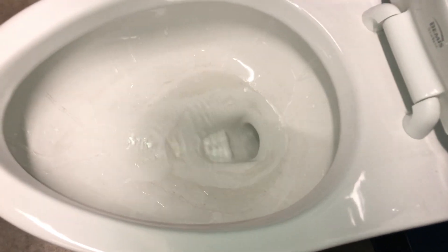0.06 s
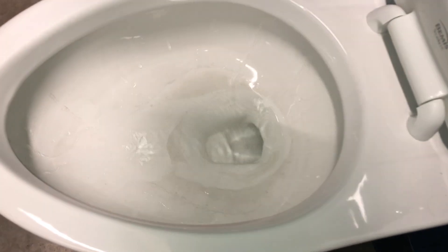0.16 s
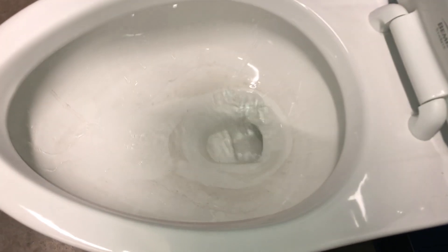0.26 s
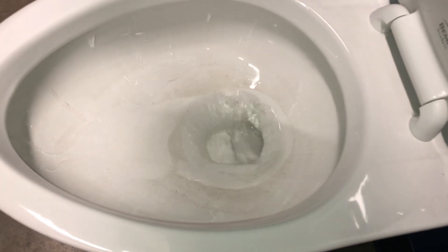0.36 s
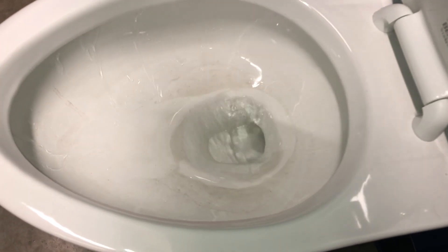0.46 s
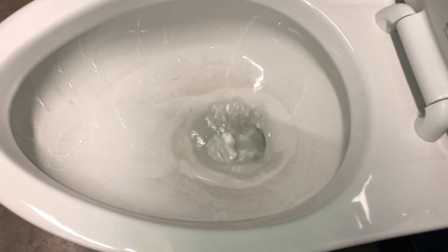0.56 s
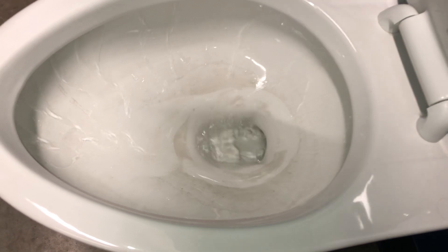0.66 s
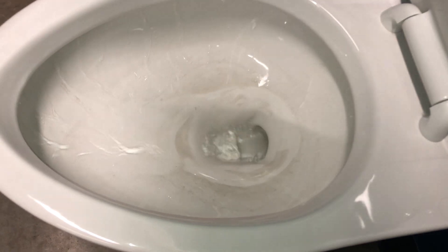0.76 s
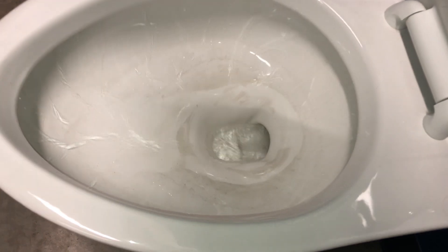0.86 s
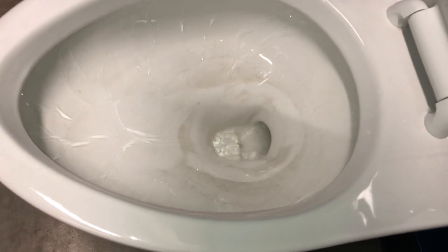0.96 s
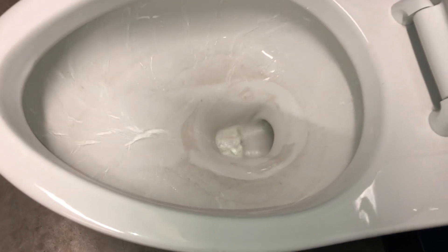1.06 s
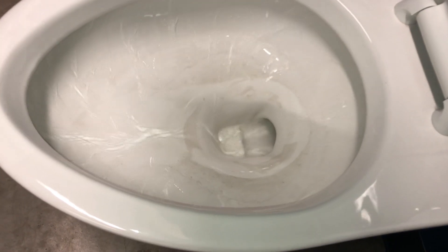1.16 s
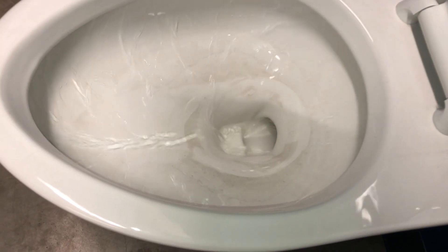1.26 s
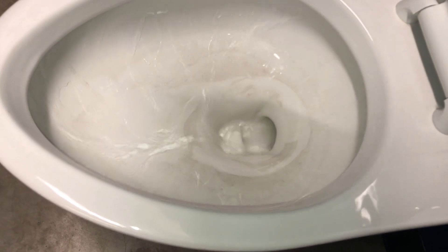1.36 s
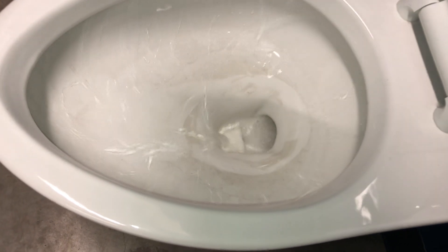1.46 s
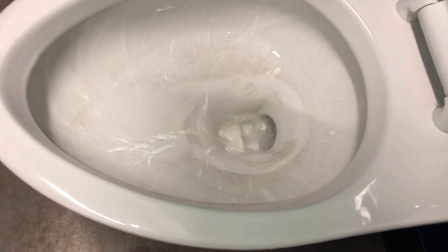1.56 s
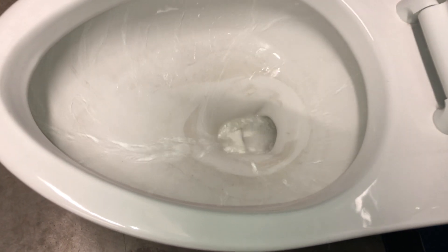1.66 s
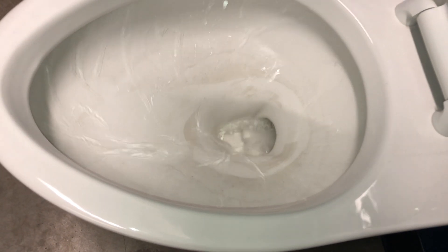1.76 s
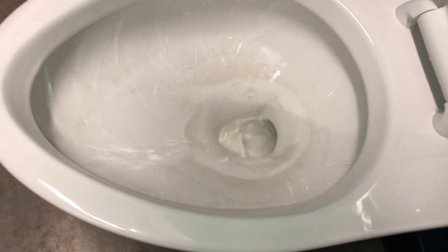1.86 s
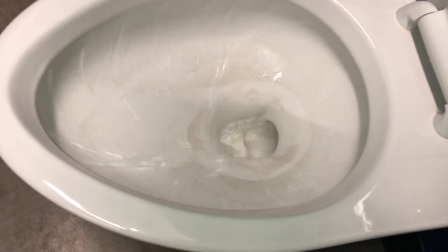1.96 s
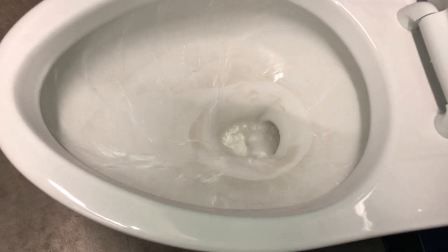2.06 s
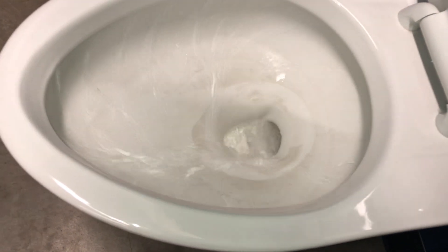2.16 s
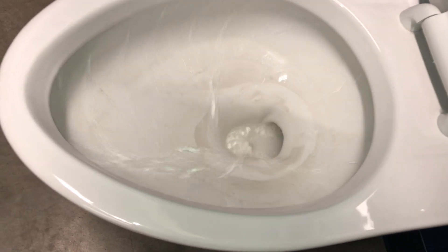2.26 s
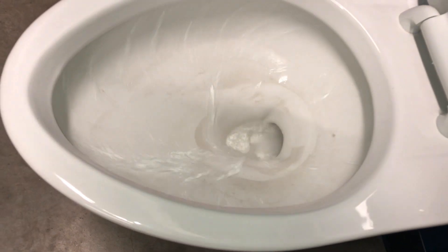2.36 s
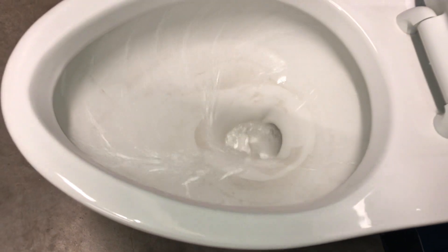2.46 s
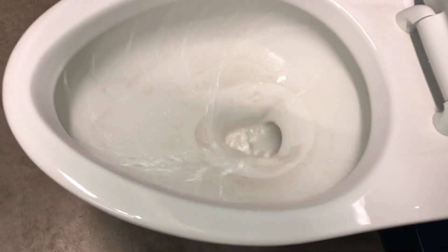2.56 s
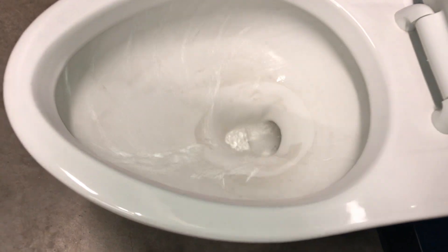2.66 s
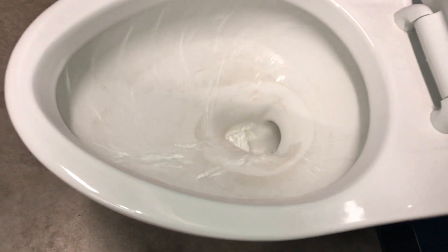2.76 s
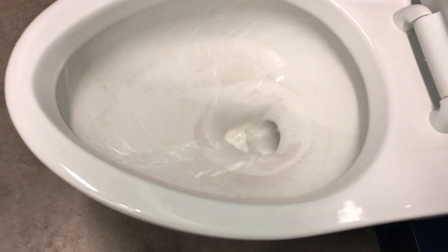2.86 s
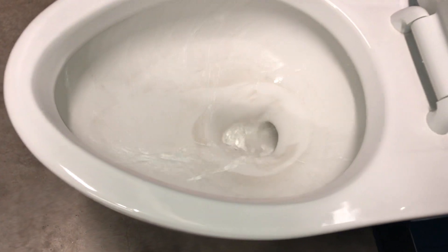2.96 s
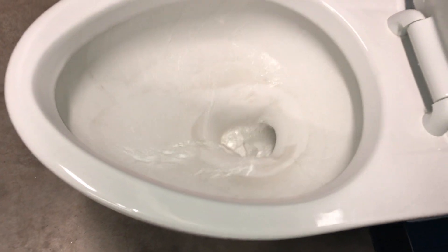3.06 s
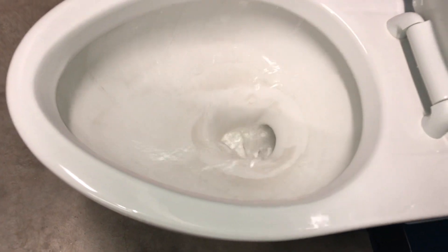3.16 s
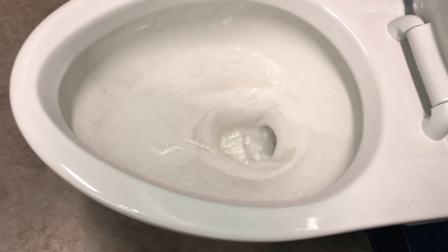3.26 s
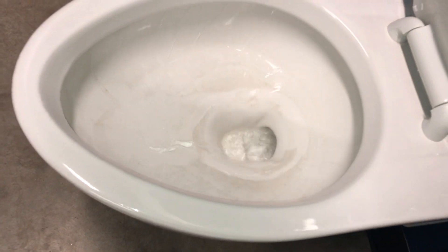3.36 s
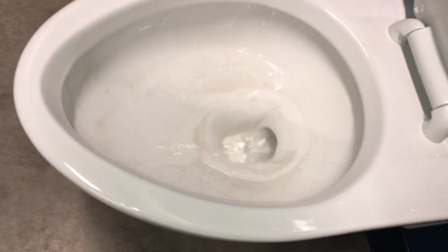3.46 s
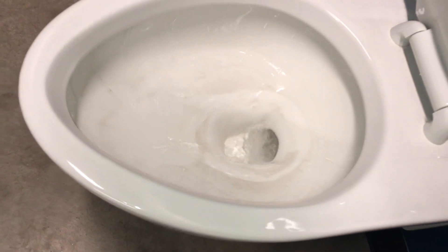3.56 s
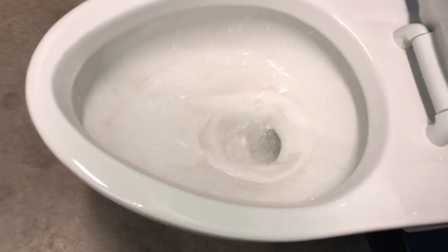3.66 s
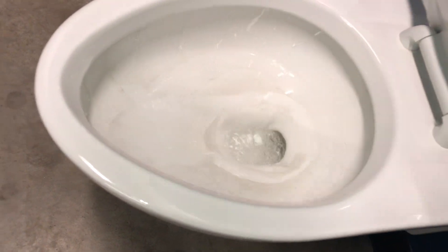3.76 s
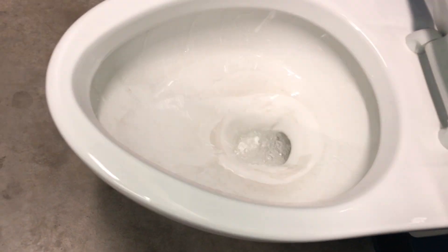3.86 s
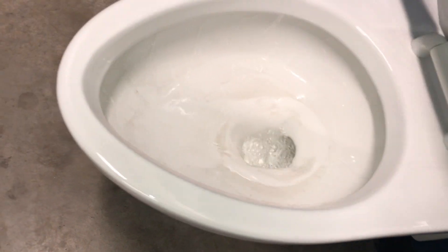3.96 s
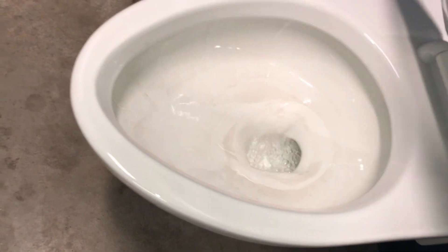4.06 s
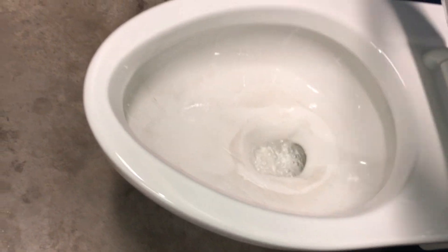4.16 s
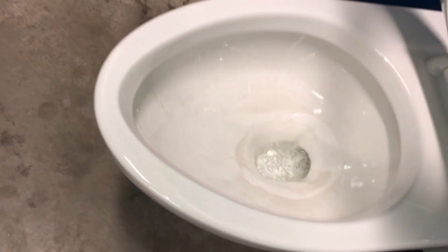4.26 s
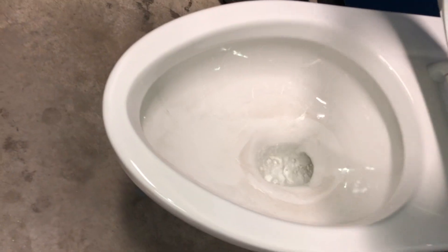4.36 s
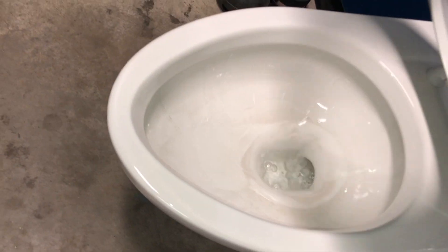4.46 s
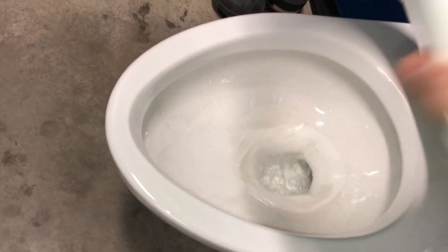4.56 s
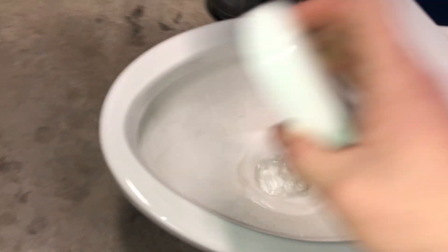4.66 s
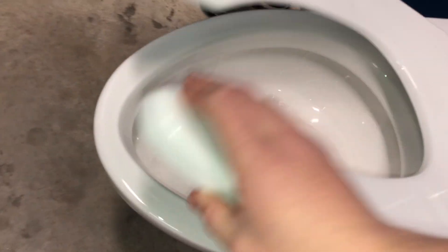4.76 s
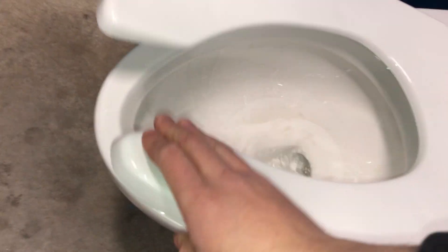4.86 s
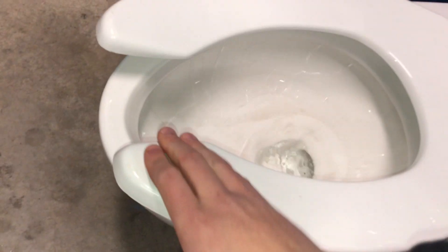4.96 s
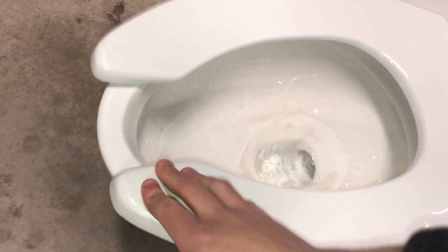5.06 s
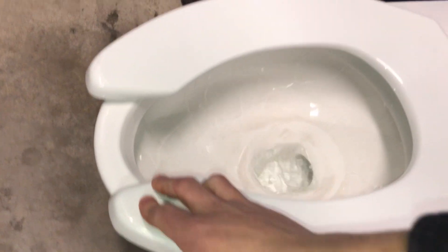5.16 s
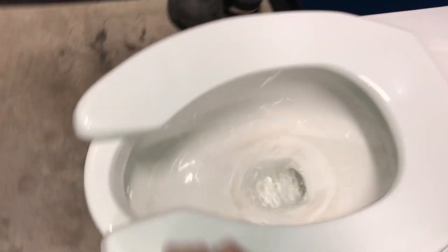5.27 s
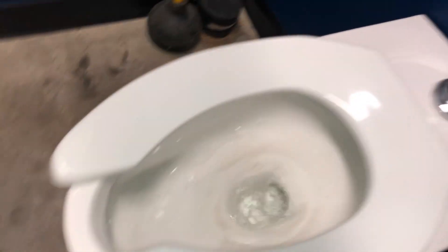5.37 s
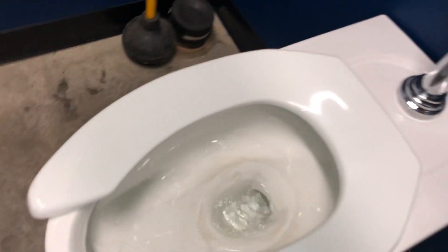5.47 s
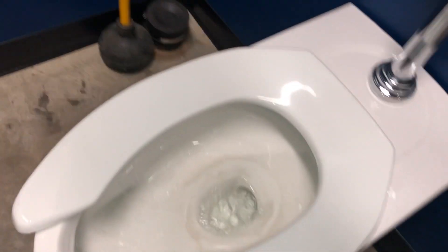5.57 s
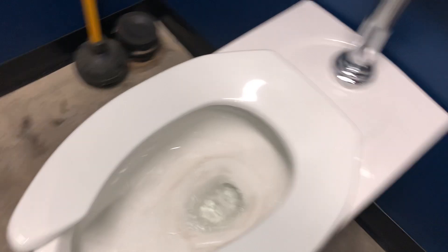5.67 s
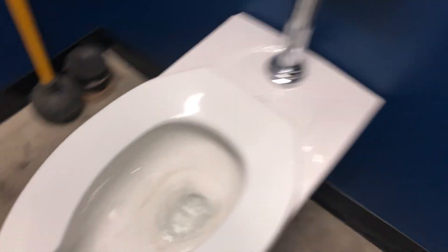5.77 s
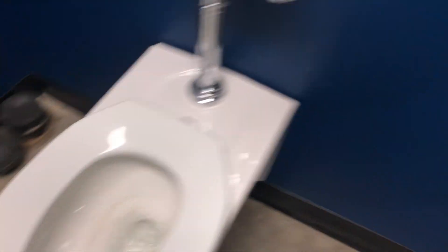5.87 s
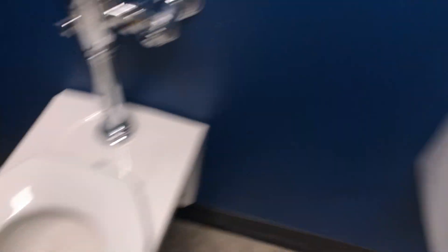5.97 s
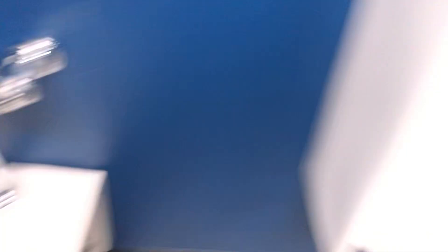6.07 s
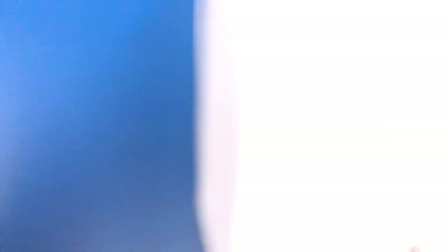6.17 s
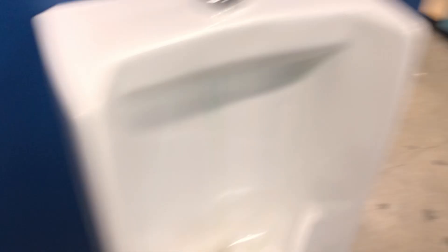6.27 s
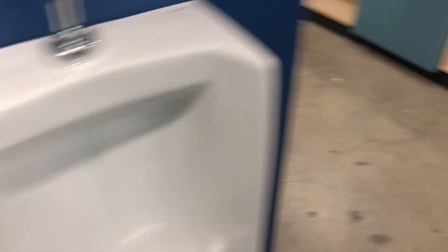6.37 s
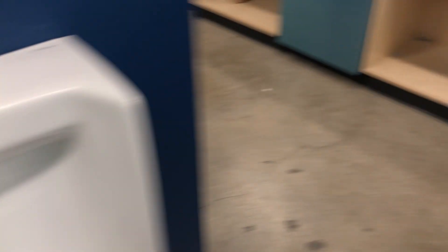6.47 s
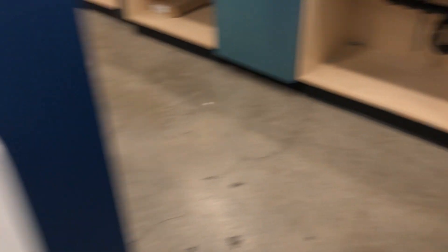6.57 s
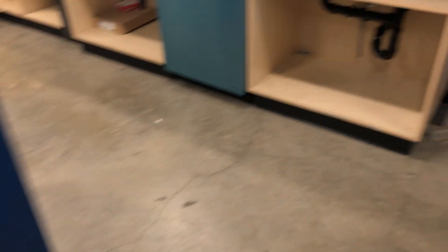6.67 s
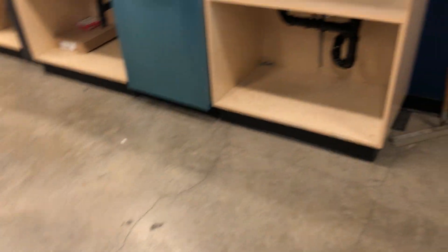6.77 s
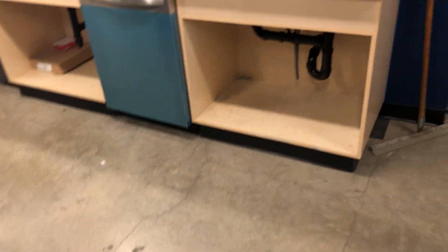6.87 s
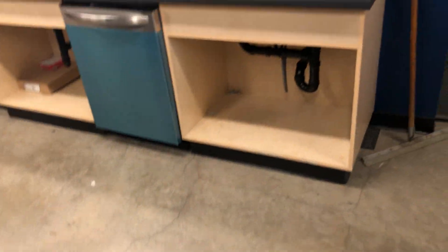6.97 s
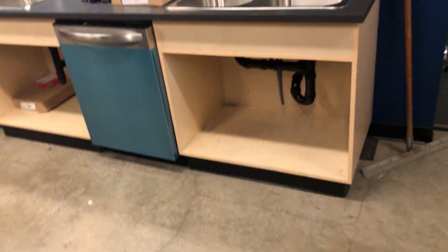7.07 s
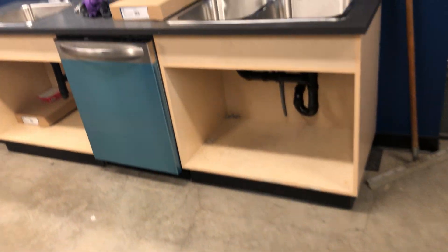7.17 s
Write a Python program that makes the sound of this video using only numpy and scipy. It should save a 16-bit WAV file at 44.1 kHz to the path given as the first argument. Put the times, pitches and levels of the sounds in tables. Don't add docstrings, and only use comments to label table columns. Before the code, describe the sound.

A toilet gurgles and gulps, its flush roars around the china bowl, cuts off into drips, then the plastic seat clatters down and shoes scuff concrete.

```python
import sys
import numpy as np
from scipy import signal
from scipy.fft import rfft, irfft, next_fast_len
from scipy.io import wavfile
from scipy.ndimage import uniform_filter1d

SR = 44100
rng = np.random.default_rng(int(sys.argv[2]) if len(sys.argv) > 2 else 0)


def convert_level_to_amplitude(level_db):
    exponent = np.asarray(level_db, float) / 20
    return 10 ** exponent


def pcm_store(signal):
    levels = np.round(np.clip(np.atleast_2d(signal), -1, 1) * 32767)
    wavfile.write(sys.argv[1], SR, levels.astype(np.int16).T)


N = 318402
JET_ON_S, JET_OFF_S = 0.875, 3.21
EDGE_HZ = 15740


def evened(x):
    return x / np.sqrt(np.mean(x ** 2) + 1e-20)


def read(points, hz):
    f, value = np.transpose(points)
    return np.interp(np.log(hz + 1), np.log(f + 1), value)


def curves(rows):
    s, *columns = np.transpose(rows)
    return [np.interp(np.arange(N) / SR, s, c) for c in columns]


def add(mix, s, sound):
    part = mix[round(s * SR):][:len(sound)]
    part += sound[:len(part)]


def colour(x, gain):
    size = next_fast_len(len(x))
    spectrum = rfft(x, size) * gain(np.fft.rfftfreq(size, 1 / SR))
    return evened(irfft(spectrum, size)[:len(x)])


def below(hz, edge_hz, order=6):
    return 1 / np.sqrt(1 + (hz / edge_hz) ** (2 * order))


def above(hz, edge_hz):
    return np.sqrt(1 - below(hz, edge_hz) ** 2)


def patchy(patch_db, flicker_db, frames=6, bins=5):
    count = N // 128 + 6
    a, b, patches = rng.standard_normal((count, 257, 3)).T
    patches = uniform_filter1d(patches, bins, axis=0)
    patches = evened(uniform_filter1d(patches, frames, axis=1))
    flicker = evened(uniform_filter1d(rng.standard_normal(count), size=5))
    depth = np.clip(np.arange(257) / 14, .15, 1)[:, None]
    z = (a + 1j * b) * convert_level_to_amplitude(depth * (patch_db * patches + flicker_db * flicker))
    return evened(signal.istft(z, nperseg=512, noverlap=384)[1][:N])


def blip(hz, cycles, glide):
    u = np.arange(int(4 * cycles * SR / hz) + 8) * hz / SR
    swing = np.sin(2 * np.pi * u * (1 + glide * u / cycles))
    return swing * np.exp(-2 * u / cycles) * (1 - np.exp(-2 * u))


def bubbles(per_s, spread_db, cycles, size, count=30):
    out = np.zeros(size)
    for hz in np.geomspace(190, 15000, num=count):
        how_many = int(per_s * np.sqrt(hz / 1000) * size / SR)
        at, luck = rng.random((how_many, 2)).T
        strength = convert_level_to_amplitude(spread_db * np.minimum(-np.log(luck), 2.8))
        clicks = np.bincount((at * size).astype(int), strength, size)
        shape = blip(hz, cycles, 0.043)
        shape = shape / np.linalg.norm(shape) * (hz / 1000) ** 0.13
        out += signal.oaconvolve(clicks, shape)[:size]
    return np.resize(evened(out), N)


# time in seconds, water flow in dB, air gulped by the trap in dB.
FLOW = [(0.0, -16, -1), (0.3, -15.5, -4.5), (0.45, -11.5, -7), (0.74, -8, -1.5), (0.84, -12.5, -4.5),
        (0.95, -1.5, 4), (1.15, 4, 2.5), (1.5, 0, -1.5), (2.84, -1.5, -3), (2.92, -3.5, -3.5),
        (3.04, -12, -10.5), (3.19, -14, -33), (3.3, -21, -24), (3.58, -21, -18.5), (3.66, -31.5, -18),
        (4.25, -35.5, -34), (4.33, -42.5, -24), (5.06, -44, -28)]
SPLITS_HZ = [175, 480, 1600, 6500, SR]
# level in dB while sucking, under the jet and while draining,
# then how far it follows the flow and the air (shares).
LAYERS = [
    (-28, -30, -29, 0.086, 1),
    (-27.5, -29, -26.5, 0.64, 0.29),
    (-27.5, -25.5, -28, .95, 0.03),
    (-19.5, -23.5, -32, 0.83, 0.14),
]
# time in seconds, half length in seconds,
# centre in Hz, lift in dB.
SURGES = [(0.0, 0.035, 405, 20.5), (0.068, 0.012, 10000, -4), (0.888, 0.014, 10000, -8),
          (0.865, 0.015, 10000, -7), (0.915, 0.012, 10000, -5), (0.7, 0.2, 4500, 2), (0.84, 0.06, 7000, -8),
          (0.9, 0.05, 3200, -3), (1.194, 0.29, 12000, -4), (0.887, 0.1, 600, 13), (1.475, 0.031, 900, 7.5),
          (1.463, 0.02, 3200, 8), (1.649, 0.021, 300, 11), (1.645, 0.036, 10000, -5), (2.09, 0.053, 300, 9),
          (2.176, 0.033, 900, -3), (2.085, 0.02, 10000, -5), (2.192, 0.014, 10000, -6),
          (2.226, 0.018, 10000, -6), (1.82, 0.02, 10000, -3), (2.38, 0.025, 8000, -3),
          (2.236, 0.024, 900, 6), (2.252, 0.018, 3200, 3.5), (2.73, 0.02, 10000, 3), (2.815, 0.034, 700, 6),
          (3.338, 0.02, 10000, 2), (3.5, .03, 9000, 10), (3.584, 0.051, 900, 5), (3.586, 0.027, 12000, 3),
          (3.902, 0.034, 10000, 5), (4.21, 0.085, 4000, 9), (4.4, 0.05, 10000, -14), (4.723, 0.02, 900, 19),
          (4.934, .012, 3500, 17)]


def layer_levels(length):
    chop_db, chop_s, surge_octaves = 1, .04, 0.55
    t = np.arange(length) / SR
    flow_db, air_db = (c[:length] for c in curves(FLOW))
    levels = []
    for (*_, by_flow, by_air), lo, hi in zip(LAYERS, SPLITS_HZ, SPLITS_HZ[1:]):
        knots = np.arange(0, 6, .01)
        chop = evened(uniform_filter1d(rng.standard_normal(len(knots)), max(int(chop_s * 100), 1)))
        db = by_flow * flow_db + by_air * air_db + chop_db * np.interp(t, knots, chop)
        centre_hz = np.sqrt(lo * min(hi, EDGE_HZ))
        for s, half_s, hz, lift_db in SURGES:
            near = np.exp(-(np.log2(hz / centre_hz) / surge_octaves) ** 2)
            first = max(int((s - half_s) * SR), 0)
            moments = t[first:int((s + half_s) * SR)]
            add(db, first / SR, near * lift_db * np.clip(1 - abs(moments - s) / half_s, 0, 1))
        levels.append(db)
    return levels


def churning():
    t = np.arange(SR // 10) / SR
    echoes = rng.standard_normal(len(t)) * convert_level_to_amplitude(-60 * t / .09)
    churn = patchy(patch_db=2.0, flicker_db=1.45)
    sent = colour(churn, lambda hz: .4 + .6 * above(hz, 1900))
    return evened(churn + .47 * signal.oaconvolve(sent, echoes / np.linalg.norm(echoes))[:N])


# pitch in Hz, level in dB per Hz.
SUCKING = [(71, -49), (120, -4), (150, -27), (217, 0), (306, -3.5), (383, 2), (510, -21.5), (600, -12),
           (664, -21.5), (2600, -26), (4400, -23), (5600, -22), (6200, -29), (7300, -32), (9800, -23),
           (13300, -20), (14400, -25), (15600, -26)]
# pitch in Hz, level in dB per Hz.
WATER = [(71, -45), (120, -7.5), (288, 5), (399, 5), (520, -10.5), (678, -6.5), (901, -13.5), (1060, -12.5),
         (1530, -16.5), (2000, -14.5), (3190, -12.5), (6770, -17), (11700, -10.5), (15600, -16)]
# pitch in Hz, level in dB per Hz.
DRAINING = [(240, -15), (400, -12.5), (519, -18), (653, -8.5), (773, -14), (848, -15), (1050, -10.5),
            (1880, -11.5), (2260, -5), (2560, -3.5), (5500, -11), (7250, -14.5), (15600, -23)]
# pitch in Hz, width in Hz, lift in dB.
BOWL = [(218.7, 14, 10.5), (295, 34, 12), (383, 22, 3), (725, 240, 8.5), (1072, 110, 9), (1413, 44.6, 8),
        (1500, 40, -4), (1860, 57, -8), (2120, 60, 0.5), (2800, 93, 1), (3244, 210, 4.5), (4280, 640, 3.5),
        (5640, 210, 0.5)]


def flush():
    def bowl(hz):
        return 1 + sum((convert_level_to_amplitude(db) - 1) / (1 + (2 * (hz - f) / w) ** 2) for f, w, db in BOWL)

    t, end = np.arange(N) / SR, int(FLOW[-1][0] * SR)
    churn = churning()
    gurgle = bubbles(per_s=60, spread_db=3.0, cycles=7.4, size=N // 2)
    dense = churn + 0.49 * colour(gurgle, lambda hz: above(hz, 570))
    foam = bubbles(per_s=4.2, spread_db=8.0, cycles=4.0, size=N // 3)
    crackle = colour(foam, lambda hz: above(hz, 4800)) * np.clip(5.2 - t, .3, 1)
    plops = bubbles(per_s=12, spread_db=0.5, cycles=20, size=N // 3)
    sparse = 0.73 * churn + 0.51 * plops + 0.33 * crackle

    on, off = (np.clip((t - s) / 0.081 + .5, 0, 1) for s in (JET_ON_S, JET_OFF_S))
    stages = [(dense, SUCKING, 1 - on), (dense, WATER, on - off), (sparse, DRAINING, off)]
    out, levels = np.zeros(N), layer_levels(end)
    for stage, (drive, shape, share) in enumerate(stages):
        live = np.flatnonzero(share[:end] > 0)
        rung = colour(drive[live], lambda hz: convert_level_to_amplitude(read(shape[:-1], hz)) * bowl(hz))
        for layer, db, lo, hi in zip(LAYERS, levels, SPLITS_HZ, SPLITS_HZ[1:]):
            band = colour(rung, lambda hz: above(hz, lo) * below(hz, hi))
            out[live] += np.sqrt(share[live]) * convert_level_to_amplitude(layer[stage] + db[live]) * band

    hz = np.fft.rfftfreq(SR, 1 / SR)
    middle = irfft(rfft(out[:SR]) * above(hz, 750) * below(hz, 1400), SR)
    out[:SR] -= middle * np.interp(t[:SR], [.83, .87, .91, .95], [0, .4, .4, 0])
    return out


# start in seconds, length in seconds, first pitch in Hz, last pitch in Hz, level in dB.
POCKETS = [(0, 0.069, 273.5, 268, -24.5), (0, 0.16, 1784, 1746, -44), (0, .45, 2120, 2120, -49),
           (.1, 0.055, 846, 915, -34), (.1, 0.069, 1210, 1200, -38.5), (.05, 0.19, 1500, 1515, -46),
           (.112, 0.28, 247.3, 210.4, -30.5), (.284, 0.088, 618, 598, -32.5), (.36, 0.18, 816, 820, -40.5),
           (.52, 0.04, 2860, 2790, -48), (.579, 0.23, 294.8, 329, -32), (.813, 0.055, 290, 310, -23.5),
           (.86, .025, 380, 520, -25), (3.403, .015, 756, 756, -40.5), (3.45, 0.065, 1380, 1330, -52),
           (3.558, 0.03, 1070, 1000, -34), (3.576, 0.014, 800, 730, -33.5),
           (3.798, 0.17, 1596, 1550, -57.5), (3.865, 0.035, 678, 677, -48), (3.91, 0.04, 680, 690, -51),
           (3.815, 0.02, 1100, 1300, -52), (3.92, 0.025, 1450, 1400, -54), (3.86, 0.07, 2300, 2350, -57),
           (4.147, 0.02, 2260, 2280, -56), (4.175, 0.015, 2280, 2250, -56), (4.14, 0.09, 1540, 1570, -60)]
# start in seconds, length in seconds, first pitch in Hz, last pitch in Hz, level in dB.
CAVITIES = [(0.78, 0.08, 560, 560, -34), (0.865, 0.055, 480, 660, -24), (0.1, 0.5, 3500, 3500, -46),
            (0.922, 0.06, 1000, 1250, -25), (0.91, 0.3, 600, 700, -28), (0.995, 0.03, 900, 1000, -24),
            (0.74, 0.06, 4900, 4600, -36), (0.715, 0.04, 11300, 11800, -36),
            (0.45, 0.22, 13300, 13200, -38), (0.4, 0.17, 5600, 5600, -43), (0.63, 0.1, 4200, 4500, -41),
            (1.03, 0.15, 1050, 1356, -26), (2.221, 0.03, 1050, 1116, -24.5),
            (3.089, .099, 3200, 3280, -40.5), (3.596, .034, 1310, 1360, -45.5),
            (3.878, 0.04, 2900, 2750, -55), (6.747, 0.27, 2200, 2200, -65)]


def pockets():
    out = np.zeros(N)
    narrow = [(*row, 23 + 0.016 * row[2]) for row in POCKETS]
    broad = [(*row, 540) for row in CAVITIES]
    for start, length_s, first_hz, last_hz, db, width in narrow + broad:
        length = int(length_s * SR)

        def slow(f):
            return 1 / (1 + (2 * f / width) ** 2) * below(f, 0.6 * first_hz)

        a, b = (colour(v, slow)[:length] for v in rng.standard_normal((2, SR // 2)))
        turn = 2 * np.pi * np.cumsum(np.linspace(first_hz, last_hz, length)) / SR
        whistle = evened(a * np.cos(turn) + b * np.sin(turn))
        add(out, start, convert_level_to_amplitude(db) * whistle * signal.windows.tukey(length, .35))
    return out


# time in seconds, peak level in dB, dullest pitch in Hz.
SPURTS = [(0.0844, -20, 7000), (0.1481, -21, 7000), (0.1855, -16, 7000), (0.3394, -21, 7000),
          (0.7524, -18, 7000), (0.8754, -12, 7000), (0.9014, -12, 7000), (2.1016, -12, 7000),
          (2.155, -8, 7000), (2.2024, -13, 7000), (2.2409, -13, 7000), (2.2717, -11, 7000),
          (2.5486, -14, 7000), (2.6574, -12, 7000), (2.7965, -15, 7000), (2.8764, -14, 7000)]


def spurts():
    out, t = np.zeros(N), np.arange(SR // 20) / SR
    for s, db, hz in SPURTS:
        spit = colour(rng.standard_normal(len(t)), lambda f: above(f, hz))
        add(out, s, convert_level_to_amplitude(db - 9.5 - 60 * t / .03) * spit)
    return out


# time in seconds, peak level in dB, pitch in Hz.
THUDS = [
    (3.241, -32, 48),
    (3.328, -33, 45),
    (5.135, -41, 48),
]


def valve():
    out = np.zeros(N)
    for s, db, hz in THUDS:
        u = np.arange(int(2.6 * SR / hz)) * hz / SR
        add(out, s, -convert_level_to_amplitude(db) * np.sin(2 * np.pi * u) * signal.windows.tukey(len(u), .4))
    return out


# time in seconds, peak level in dB, pitch in Hz.
DRIPS = [(3.264, -24, 5040), (3.281, -27, 3760), (3.432, -26, 4650), (3.4444, -32, 2100),
         (3.539, -26, 5400), (3.5823, -27, 8200), (3.6735, -35, 3550), (3.8836, -35, 2760),
         (4.0158, -39, 5000), (4.106, -36, 5070), (4.1823, -24, 4760), (4.185, -33, 5200),
         (4.2243, -35, 3450), (4.225, -40, 4200), (4.2338, -38, 2900), (4.2345, -37, 4650),
         (4.242, -42, 3400), (4.26, -41, 4650), (4.5371, -37, 4600), (4.569, -27, 9150),
         (4.5985, -39, 4100), (4.7095, -52, 2320), (4.927, -37, 4960), (5.0205, -41, 4950)]
# time in seconds, peak level in dB, pitch in Hz.
TICKS = [(3.229, -15, 8550), (3.262, -20, 9850), (3.3096, -26, 11800), (3.362, -27, 9830),
         (3.3839, -41, 12000), (3.4064, -23, 12900), (3.4897, -38, 14000), (3.5278, -19, 12700),
         (3.55, -32.5, 12900), (3.563, -25, 10200), (3.6244, -32, 11400), (3.658, -32, 9000),
         (3.718, -45, 8700), (3.776, -30, 12800), (4.003, -35.5, 13800), (4.016, -38, 9710),
         (4.0579, -45, 12000), (4.1372, -38, 10200), (4.1741, -45, 14300), (4.2016, -34, 11500),
         (4.2764, -47, 11700), (4.2904, -41, 10900), (4.3402, -48, 8120), (4.4126, -49, 11300),
         (4.5685, -39.5, 9230), (4.71, -39, 12500), (4.8251, -45, 8970)]


def trickle():
    out = np.zeros(N)
    for s, db, hz in DRIPS:
        add(out, s, convert_level_to_amplitude(db - 4.0) * blip(hz, 14, 0.047))
    for s, db, hz in TICKS:
        add(out, s, convert_level_to_amplitude(db + 2.5) * blip(hz, 3.5, .02))
    return out


# pitch in Hz, level in dB, seconds to fall by 60 dB.
SEAT = [(299, -3, 0.15), (390, -9, 0.1), (600, -11, 0.087), (786, -6.5, 0.1), (1000, -5, .07),
        (1120, 6, 0.21), (1330, -6, .08), (1500, -9, 0.13), (1640, -13, 0.081), (1888, -7, 0.2),
        (2170, 11.5, 0.013), (2120, -2, 0.08), (205, -8.5, 0.23), (2580, -7, 0.12), (2785, -7, .15),
        (3000, -21, .06), (3060, -5, 0.05), (3560, -1, 0.024), (4060, -9, .05), (5170, -16, 0.06)]
# time in seconds, strength of the blow in dB, hardness in Hz, # seconds of free ringing before the seat
BOUNCES = [(4.709, -49.5, 4930, 0.0062), (5.067, -58, 3500, .008), (5.0893, -17.5, 5930, 0.002),
           (5.0945, -17.5, 3860, 0.005), (5.104, -22.5, 2000, 0.0045), (5.111, -19.5, 2600, .012),
           (5.125, -25.5, 2450, 0.019), (5.134, -20.5, 1500, 0.015), (5.155, -43, 2200, 0.023),
           (5.177, -23, 1270, 0.026), (5.219, -31, 600, 0.008), (5.254, -36.5, 1290, 0.0076)]


def seat():
    rings, cracks, t = np.zeros(N), np.zeros(N), np.arange(SR // 8) / SR
    for s, blow_db, hard_hz, free_s in BOUNCES:
        modes = np.zeros(len(t))
        for hz, db, t60 in SEAT:
            a, b, c = rng.uniform(-1, 1, 3)
            level = convert_level_to_amplitude(db + 2.6 * a - 60 * t / t60) * below(hz, hard_hz, order=2)
            modes += level * np.sin(2 * np.pi * hz * (1 + 0.005 * b) * t + np.pi * c)

        def crack_tone(f):
            body = below(f, hard_hz, order=3) * above(f, 270)
            return body + 0.03 * below(hard_hz, 1.5 * f) * above(hard_hz, 2300)

        crack = colour(rng.standard_normal(len(t)), crack_tone) * convert_level_to_amplitude(-60 * t / 0.028)
        contact = np.sin(np.pi / 2 * np.minimum(t * hard_hz / 2.5, 1)) ** 2
        choke = convert_level_to_amplitude(-60 * np.maximum(t - free_s, 0) / 0.017)
        add(rings, s, convert_level_to_amplitude(blow_db) * modes * choke * contact)
        add(cracks, s, convert_level_to_amplitude(blow_db - 2.1) * crack * contact)
    return rings, cracks


# pitch in Hz, level in dB, seconds to fall by 60 dB.
CHINA = [(298, -27, .5), (388, -34, .3), (790, -33, .25), (1327, -32, .3), (1660, -31, .2),
         (1886, -22.5, .3), (2130, -19, .11), (2580, -36, .3), (2783, -31, .3), (3548, -33, .15)]


def china():
    out, t = np.zeros(N), np.arange(SR // 3) / SR
    ring = sum(convert_level_to_amplitude(db - 60 * t / t60) * np.sin(2 * np.pi * hz * t) for hz, db, t60 in CHINA)
    add(out, 5.0895, ring * np.minimum(t / .004, 1))
    return out


# pitch in Hz, level in dB per Hz.
SOLE = [(530, -42), (900, -2), (1290, -15.5), (2030, -5.5), (2230, -9), (4150, -7), (5330, -11),
        (14000, -12), (15600, -14.5)]
# start in seconds, length in seconds, rubbing level in dB,
# share of bright hiss in dB.
STROKES = [(5.406, 0.1, -51, -1.5), (5.553, 0.083, -62.5, 8.5), (5.62, 0.07, -54, -8),
           (5.732, 0.02, -52.5, 0), (5.795, 0.052, -42, -3), (5.86, 0.047, -52.5, 8.5),
           (6.435, 0.05, -62, -2), (6.505, 0.027, -58, -10), (6.539, 0.084, -52.5, -2),
           (6.58, 0.08, -51, -3), (6.699, .37, -69, -1)]
# time in seconds, level in dB, dullest pitch in Hz,
# seconds to fall by 60 dB.
HEELS = [(5.745, -52, 6000, .05), (5.655, -54, 3200, .04), (5.83, -47, 3000, .03), (5.845, -48, 5000, .03),
         (6.034, -60, 7000, .015), (6.428, -42, 2100, .06), (6.436, -55, 7500, .06),
         (6.483, -54, 8800, .02), (6.505, -46, 2900, .08), (6.551, -52, 2600, .05), (6.613, -44, 2300, .07),
         (6.633, -47, 3000, .06)]


def scuffs():
    bite_share, bite_db, lift_db_per_s = 0.47, -12, 300
    grains = bubbles(per_s=25, spread_db=2.5, cycles=4, size=N // 6)
    grit = patchy(patch_db=2.6, flicker_db=1.5) + .45 * grains
    dull = colour(grit, lambda hz: convert_level_to_amplitude(read(SOLE, hz)) * above(hz, 1400) * below(hz, 4950))
    bright = colour(grit, lambda hz: convert_level_to_amplitude(read(SOLE, hz)) * above(hz, 6100))
    out, t = np.zeros(N), np.arange(N) / SR
    for s, length, rub_db, bright_db in STROKES:
        u = t[:int((length + .15) * SR)]
        start = round(s * SR) // 2
        bite = bite_db * np.maximum(1 - u / (bite_share * length), 0)
        lift = lift_db_per_s * np.maximum(u - length, 0)
        rub = (dull + convert_level_to_amplitude(bright_db) * bright)[start:start + len(u)]
        add(out, s, convert_level_to_amplitude(rub_db + bite - lift) * rub)
    for s, db, hz, t60 in HEELS:
        noise = rng.standard_normal(SR // 8)
        tap = colour(noise, lambda f: above(f, .75 * hz) * (below(f, 1.6 * hz, order=2) + .03))
        add(out, s, convert_level_to_amplitude(db - 60 * t[:len(tap)] / t60) * tap)
    return out


# pitch in Hz, seconds to fall by 60 dB.
ROOM = [(150, .5), (500, .42), (2100, .62), (4000, .3), (7000, .17), (14000, .17)]


def room(x):
    taps = np.zeros(SR // 2)
    at = np.arange(120, len(taps) - 20, 20)
    taps[at + rng.integers(0, 20, len(at))] = rng.choice([-1., 1.], len(at))
    hz, t, z = signal.stft(taps, SR, nperseg=256)
    tail = signal.istft(z * convert_level_to_amplitude(-60 * t / read(ROOM, hz)[:, None]), SR, nperseg=256)[1]
    return signal.fftconvolve(x, tail / np.linalg.norm(tail))[:N]


# pitch in Hz, level in dB per Hz.
VENT = [(25, -29.5), (40, -7), (64, -9.5), (143, -8), (223, -1), (290, -5), (400, -11), (1000, -20.5),
        (2200, -26), (3500, -31), (5500, -39.5), (8000, -44.5), (15600, -49.5)]
# time in seconds, level in dB.
HUM_DB = [(0.0, -46.5), (2.99, -41), (3.5, -48), (4.7, -50.5), (5.31, -47), (5.97, -48), (7.22, -46)]


def vent():
    rumble_db, pipe_rumble_db = -52, -49
    air, (hum_db,) = patchy(patch_db=-0.5, flicker_db=-1.5), curves(HUM_DB)
    pipe = convert_level_to_amplitude(pipe_rumble_db) * np.clip((JET_OFF_S + 0.56 - np.arange(N) / SR) / .3, 0, 1)
    rumble = colour(air, lambda hz: convert_level_to_amplitude(read(VENT, hz)) * below(hz, 108.6))
    hum = colour(air, lambda hz: convert_level_to_amplitude(read(VENT, hz)) * above(hz, 142))
    return np.hypot(convert_level_to_amplitude(rumble_db), pipe) * rumble + convert_level_to_amplitude(hum_db) * hum


def scene():
    (rings, cracks), drops = seat(), trickle()
    walls = room(convert_level_to_amplitude(-19) * rings + convert_level_to_amplitude(-6) * cracks + convert_level_to_amplitude(-12) * drops)
    water = flush() + pockets() + spurts() + valve() + drops
    mono = water + rings + cracks + china() + scuffs() + walls + vent()
    return np.array([mono, mono])


def top_cut(x):
    return signal.sosfilt(signal.butter(12, 17040, fs=SR, output="sos"), x)


def record(dry):
    cut = signal.sosfilt(signal.butter(4, 33, "highpass", fs=SR, output="sos"), dry)
    cut = .8 * np.tanh(cut / .8)
    lowpass = signal.firwin(1401, EDGE_HZ, window=("kaiser", 9), fs=SR)
    limited = signal.oaconvolve(cut, lowpass[None], "same")
    return top_cut(limited)


dry = scene()
out = record(dry)
pcm_store(out)
```